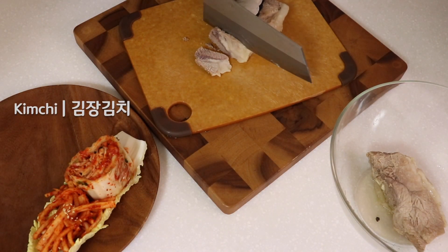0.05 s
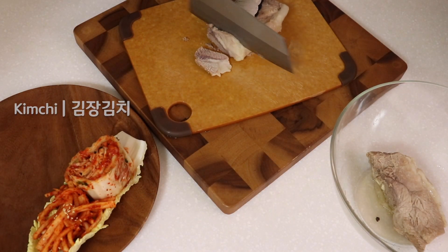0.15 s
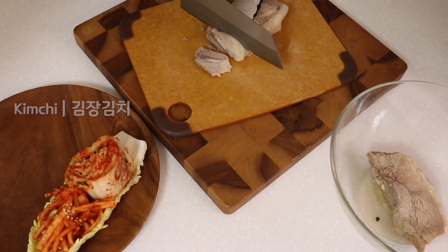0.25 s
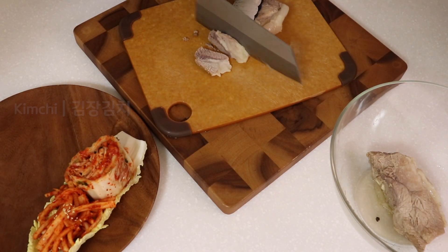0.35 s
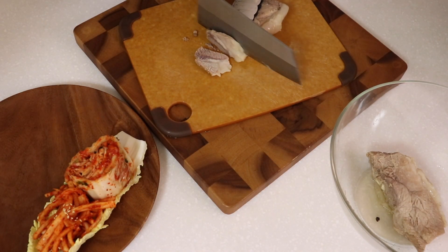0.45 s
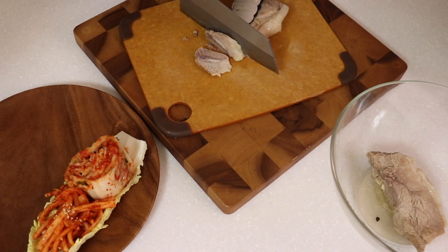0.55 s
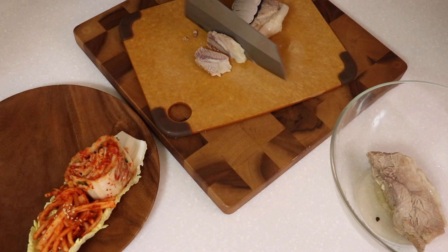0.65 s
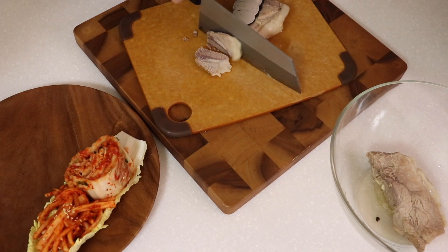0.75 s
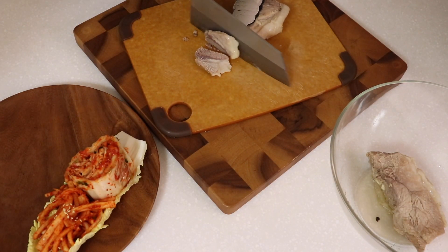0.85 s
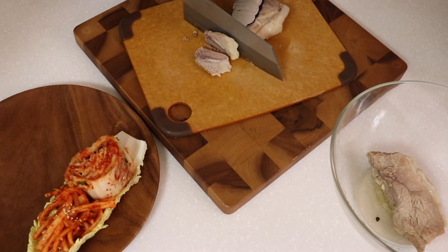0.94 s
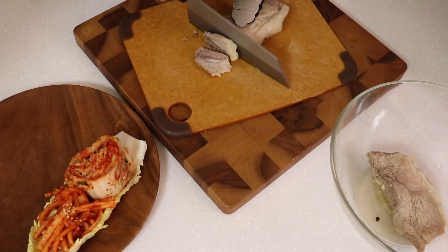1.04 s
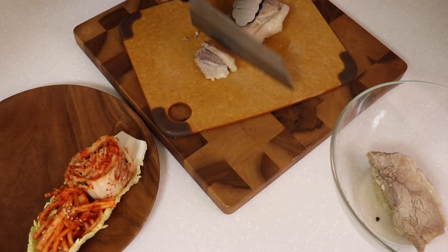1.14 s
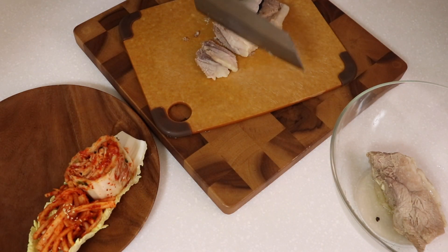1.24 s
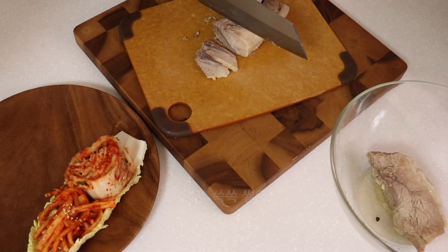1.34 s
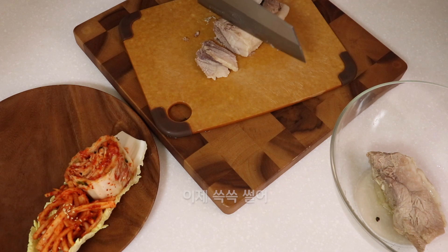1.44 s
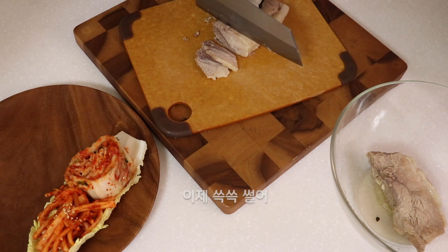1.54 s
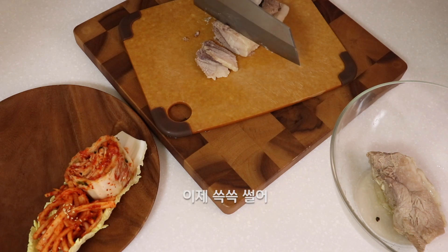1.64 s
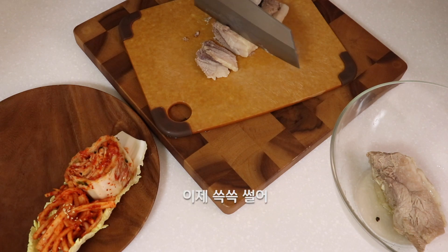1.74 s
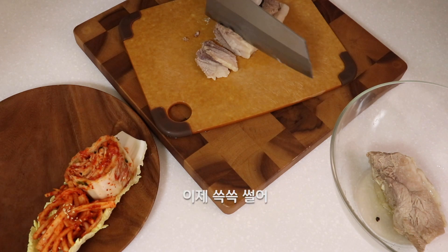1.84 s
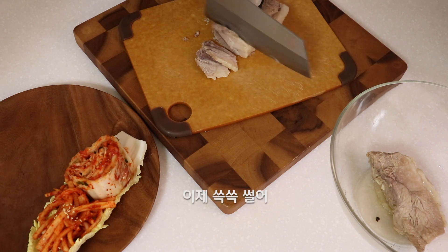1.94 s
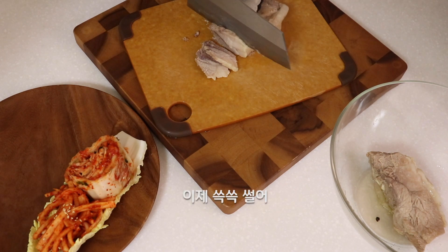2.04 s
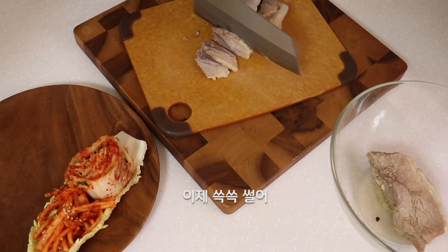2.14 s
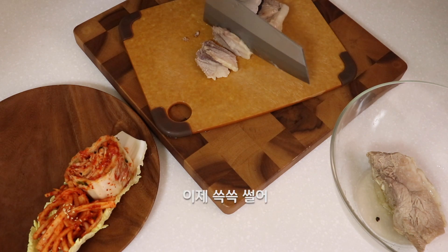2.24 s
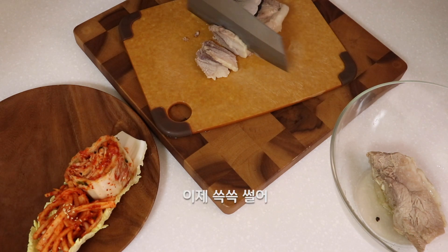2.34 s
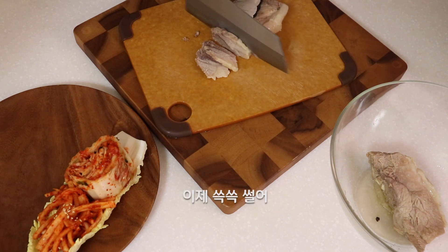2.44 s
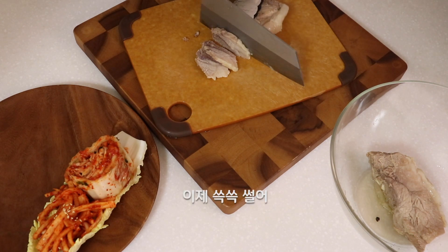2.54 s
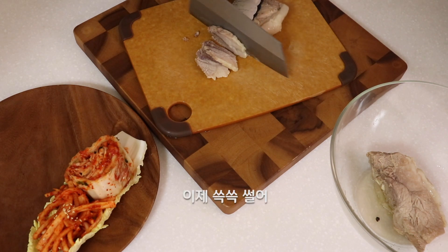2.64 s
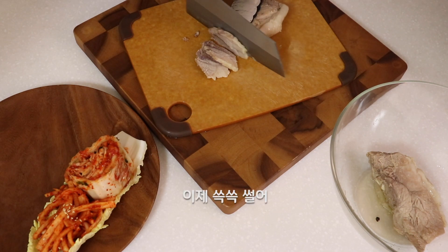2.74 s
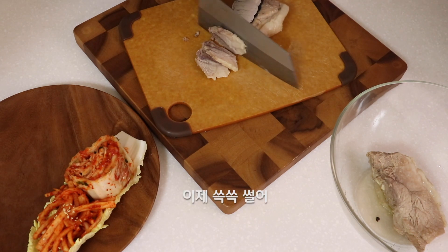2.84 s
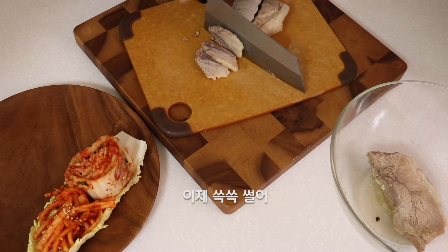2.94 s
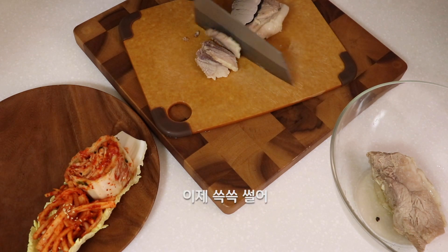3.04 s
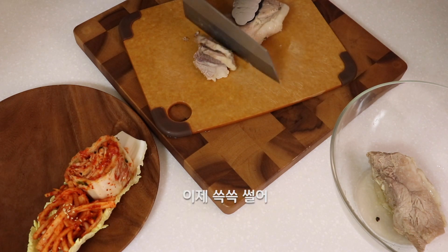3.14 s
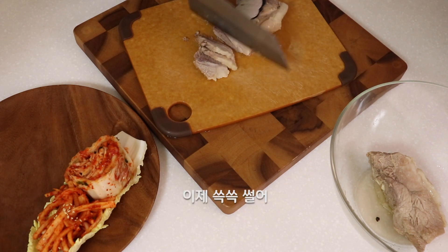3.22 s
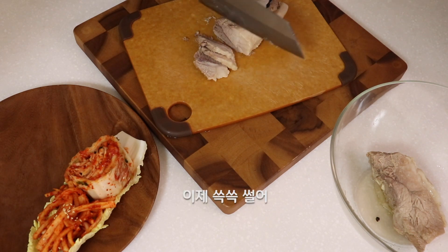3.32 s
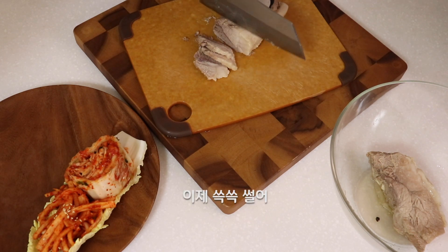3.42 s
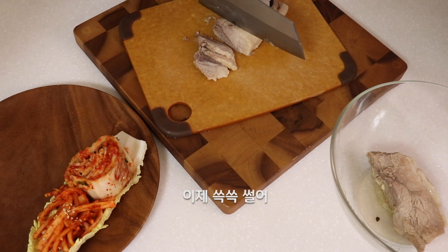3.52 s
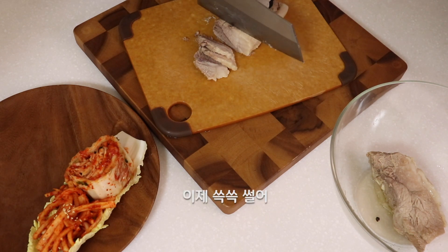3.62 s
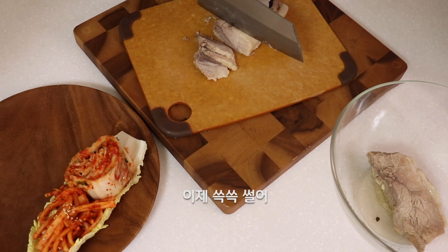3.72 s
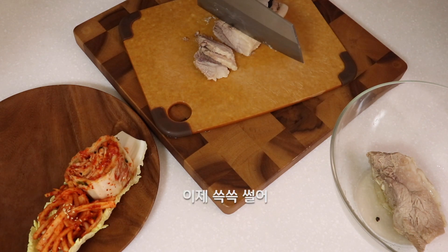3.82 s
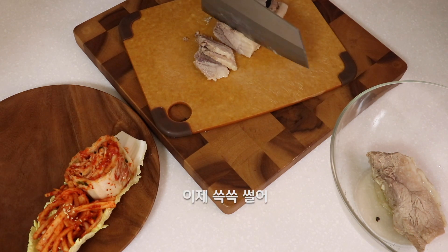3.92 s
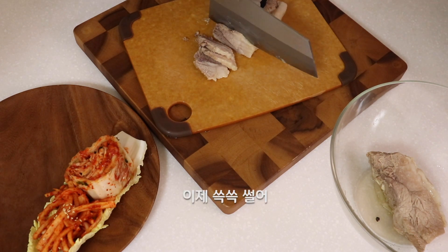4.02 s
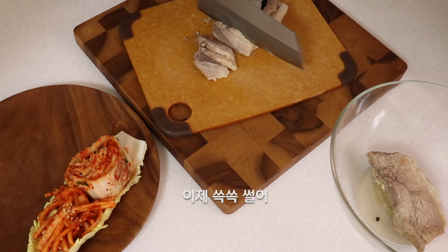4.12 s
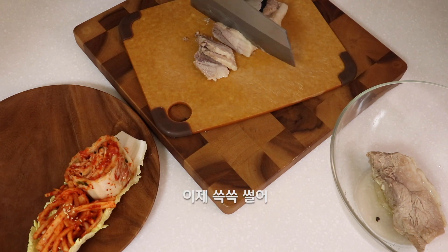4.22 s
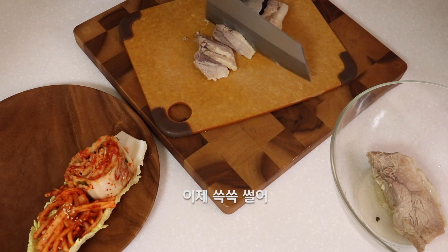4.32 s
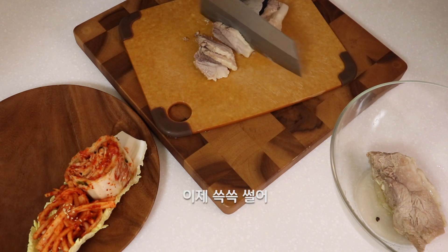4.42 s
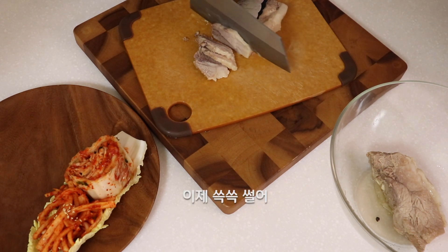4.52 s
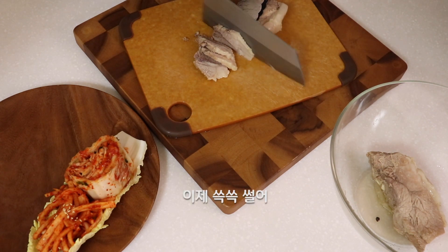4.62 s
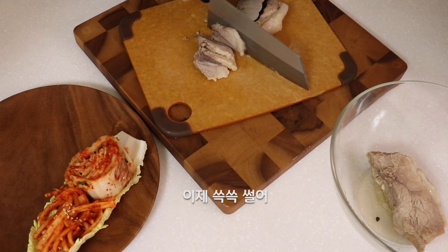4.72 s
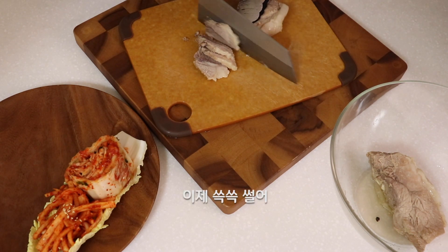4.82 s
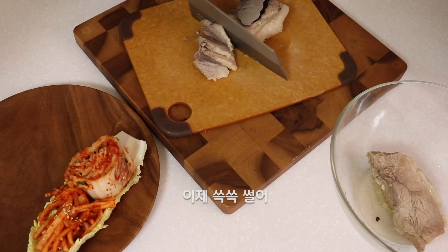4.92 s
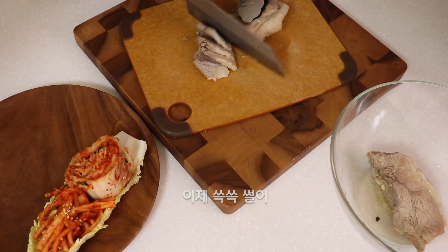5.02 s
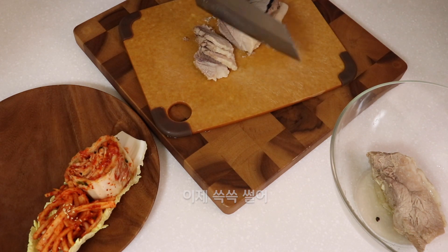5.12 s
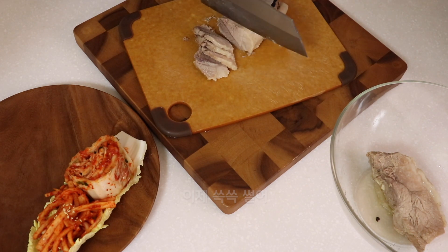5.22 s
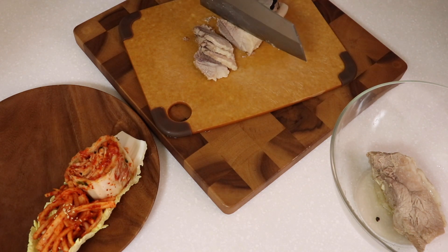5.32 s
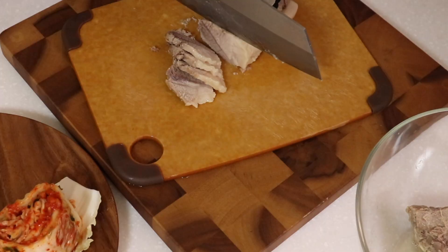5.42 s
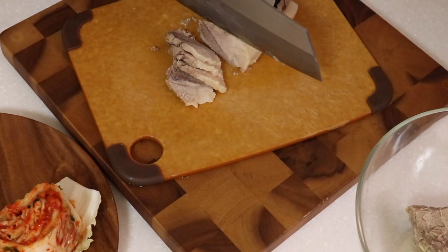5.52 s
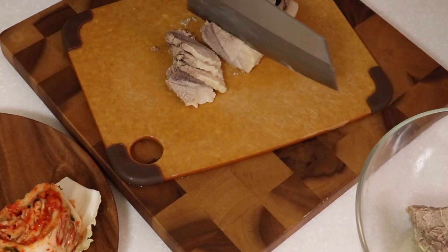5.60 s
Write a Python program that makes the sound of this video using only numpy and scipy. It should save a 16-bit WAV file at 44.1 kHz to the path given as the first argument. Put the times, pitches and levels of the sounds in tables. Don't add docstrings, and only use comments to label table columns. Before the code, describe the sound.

A heavy knife saws through moist cooked meat and knocks three times on a wooden board, scraping slices aside in a quiet humming kitchen.

```python
import sys
import numpy as np
from scipy import signal
from scipy.fft import rfft, irfft, next_fast_len
from scipy.io import wavfile

SR = 44100
rng = np.random.default_rng(int(sys.argv[2]) if len(sys.argv) > 2 else 0)


def to_linear_factor(level_db):
    exponent = np.asarray(level_db, float) / 20
    return 10 ** exponent


def put_to_file(sound):
    columns = np.atleast_2d(sound).T
    safe = np.clip(columns, -1, 1)
    whole_steps = np.round(safe * 32767)
    wavfile.write(sys.argv[1], SR, whole_steps.astype(np.int16))


N = 249606

# (pitch [Hz], level [dB], time to fade by 60 dB [s])
BOARD_MODES = [(83, -38.5, 0.504), (103.2, -27, 0.23), (242.4, -11.5, 0.16), (361.3, -4, 0.058),
               (352.3, -6.5, 0.051), (658, -9, 0.134), (668, -6.5, 0.31), (701, -9, 0.337),
               (752.5, -5.5, 0.26), (1104, -3, 0.089), (1146.7, -5.5, 0.2), (1097, 6.5, 0.0092),
               (1267, 4, 0.033), (1499, -10, 0.27), (1488, -5.5, 0.14), (1730, -6.5, 0.037),
               (1900, -7.5, 0.066), (1575, -11, 0.073), (2150, -0.5, 0.016), (2620, -10, 0.04),
               (2680, 0, 0.07), (3430, -19, 0.09), (3930, -15.5, 0.029), (4340, -27.5, 0.043)]
# (pitch [Hz], level [dB], time to fade by 60 dB [s])
BLADE_MODES = [(1132, 11, .04), (1655, 4, .05), (1717, -6, .25), (2480, 0, .08), (3795, -12, .12),
               (3985, -4, .04), (4560, -6, .04), (5184, -16, .6), (5200, 0, .07), (5232, -18, .3),
               (5943, -13, .35), (5985, -15, .3), (6100, -7, .08), (6550, -4, .1), (7240, -11, .14),
               (7960, -5, .12), (8810, 2, .06), (9200, -9, .1), (9700, -13, .2), (9960, -6, .08),
               (10840, -9, .28), (10890, -8, .2), (12450, -12, .1), (13600, -8, .06)]


def rms_one(x):
    return x / np.sqrt(np.mean(x ** 2) + 1e-20)


def peak_one(x):
    return x / np.abs(x).max()


def panned(x, pan_db):
    return x * to_linear_factor(np.array([[.5], [-.5]]) * pan_db)


def at_hz(points, hz):
    point_hz, level_db = np.array(points)[:, 0], np.array(points)[:, 1]
    return np.interp(np.log(hz), np.log(point_hz), level_db)


def drift(rate):
    r = np.exp(-80 * np.pi * rate / SR)
    noise = rng.standard_normal(N // 40 + 2002)
    slow = signal.lfilter([1], [1, -2 * r, r * r], noise)[2000:]
    return np.interp(np.arange(N) / 40, np.arange(len(slow)), rms_one(slow))


def ring(force, hz, t60):
    r = to_linear_factor(-60 / (t60 * SR))
    w = 2 * np.pi * hz / SR
    return signal.lfilter([0, np.sin(w)], [1, -2 * r * np.cos(w), r * r], force + 1e-18)


def body(force, modes, damping=1):
    out = 0
    for k, (hz, db, t60) in enumerate(modes):
        out = out + (-1) ** k * to_linear_factor(db) * ring(force, hz, t60 * damping)
    return out


def shaken(slips, gain, modes, damping):
    steady = body(slips[:SR], modes, damping)
    return body(slips * gain, modes, damping) / np.sqrt(np.mean(steady ** 2))


def grains(per_s, spread_db):
    sizes = to_linear_factor(spread_db * np.minimum(rng.exponential(1, N), 5)) * rng.choice([-1, 1], N)
    return rms_one(sizes * (rng.random(N) < per_s / SR))


def rough_pair(per_s, spread_db):
    return np.abs(grains(per_s, spread_db)) * rng.standard_normal((2, 2, N))


def banded(sources, spectrum, likeness, patchy_db, rate):
    low, high = max(spectrum[0][0], 20), min(spectrum[-1][0], 17000)
    edges = np.geomspace(low, high, int(2.5 * np.log2(high / low)) + 2)
    out = 0
    for k, band in enumerate(zip(edges, edges[1:])):
        sos = signal.butter(2, band, "band", fs=SR, output="sos")
        mid, side = signal.sosfilt(sos, sources[k % 2])
        hz = np.sqrt(band[0] * band[1])
        alike = np.clip(at_hz(likeness, hz), 0, 1)
        gain = to_linear_factor(at_hz(spectrum, hz) + patchy_db * drift(rate))
        out = out + gain * (np.sqrt(1 + alike) * mid + np.sqrt(1 - alike) * side * [[1], [-1]])
    return rms_one(out)


def swells(rows, db):
    span_db, roundness = 13.5, 1.37
    t, power = np.arange(N) / SR, np.zeros(N)
    for (s, rise, fall, *_), top_db in zip(rows, db):
        part = slice(max(round((s - 4 * rise) * SR), 0), round((s + 4 * fall) * SR))
        away = np.where(t[part] < s, (s - t[part]) / rise, (t[part] - s) / fall)
        power[part] += to_linear_factor(top_db - span_db * away ** roundness) ** 2
    return np.sqrt(power)


def sawing():
    # (peak time [s], rise [s], fall [s], fibre tearing [dB], wet drag [dB])
    strokes = [(.05, 0.24, 0.36, -75.5, -69), (.425, 0.062, 0.054, -64.5, -68),
               (.475, 0.054, 0.037, -63.5, -67.5), (.6, 0.083, 0.079, -69, -80),
               (.73, 0.16, 0.13, -70.5, -72.5), (.8, 0.052, 0.018, -69, -68),
               (1.42, 0.012, 0.024, -82.5, -68), (1.91, 0.042, 0.1, -70, -74),
               (2.06, .06, 0.34, -72.5, -71.5), (2.2, 0.045, 0.048, -70, -68.5),
               (2.285, 0.097, 0.051, -66, -64), (2.36, 0.064, 0.32, -70, -67.5),
               (2.525, .025, 0.15, -66, -66.5), (2.67, 0.022, 0.15, -71, -84),
               (2.757, .02, .02, -89, -67.5), (2.88, 0.061, 0.017, -64, -62), (4.02, 0.037, .11, -67, -72),
               (4.2, 0.096, 0.12, -78, -78), (4.39, 0.093, 0.097, -66.5, -65), (4.51, 0.11, 0.26, -72, -67),
               (4.665, 0.067, 0.08, -65.5, -62), (4.73, 0.061, 0.058, -63, -58.5)]
    # (time [s], level [dB])
    tugs = [
        (.215, -70),
        (.538, -65),
        (1.575, -72),
        (3.508, -82),
        (4.097, -77.5),
        (5.338, -79),
        (5.445, -82),
        (5.66, -69),
    ]
    # (pitch [Hz], level [dB per Hz])
    crackle_colour = [(1760, -26.5), (3000, -12), (4150, -8), (7100, -2.5), (8200, -3.5), (8970, -8),
                      (11100, -4), (15600, -16.5)]
    # (pitch [Hz], level [dB per Hz])
    drag_colour = [(700, -29.5), (1200, -7), (1900, -12), (2800, -10), (4200, -16.5), (6000, -18.5)]
    tug_rise_s, tug_fall_s, tug_wet_db = .015, 0.046, -7.5
    rows = strokes + [(s, tug_rise_s, tug_fall_s, db, db + tug_wet_db) for s, db in tugs]
    *_, tearing_db, wet_db = np.transpose(rows)
    crackle = banded(rough_pair(4997, spread_db=-1.0), crackle_colour,
                     [(4000, 0.7), (14000, 0.22)], patchy_db=1.0, rate=22.0)
    drag = banded(rough_pair(12000, spread_db=1.0), drag_colour,
                  [(1000, 0.78), (4000, 0.34)], patchy_db=4.0, rate=17.0)
    clumps = to_linear_factor(2.2 * drift(49))
    return panned(crackle * swells(rows, tearing_db) * clumps, -0.86) + drag * swells(rows, wet_db)


def snaps():
    # (time [s], peak level [dB], pitch [Hz], pan [dB], width [octaves])
    fibres = [(0.049, -59, 4560, -21, 1), (0.1194, -65, 4830, -1.5, 0.8), (0.2324, -51, 10100, 3, 0.67),
              (0.419, -44.5, 7600, -0.5, 0.59), (0.532, -45, 7500, -3, 0.74), (0.5948, -53, 5130, 0.0, 0.5),
              (0.6659, -68, 7180, -0.5, 0.87), (0.6873, -63, 9400, -2, 0.8), (0.728, -50, 9610, 2, 0.63),
              (1.5697, -56, 6700, -7, 0.41), (2.11, -58, 4590, -1.5, 0.72), (2.202, -54, 5790, -5, 1),
              (2.289, -52, 10600, 1, 0.68), (2.5102, -50, 6440, -4, 0.73), (2.574, -50, 6620, -0.5, 0.23),
              (3.5079, -57, 8670, -3.5, 0.8), (4.097, -49.5, 4980, -3, 0.33), (4.097, -52, 9000, -2, 1),
              (0.277, -61, 1500, -2, 1), (1.571, -56, 1500, 0.0, 0.9), (4.3665, -64, 5640, -1.5, 0.8),
              (4.564, -57, 5050, -6, 0.65), (4.6947, -57, 7040, -1.0, 0.8), (4.7187, -62, 8550, -1.5, 0.8),
              (5.3363, -57, 11380, -4.5, 0.66), (5.441, -58, 5320, -4.5, 0.8)]
    out, t = np.zeros((2, N)), np.arange(400) / SR
    for (s, db, hz, pan_db, width), noise in zip(fibres, rng.standard_normal((len(fibres), len(t)))):
        edges = hz * 2 ** (np.clip(width, .1, 2) * np.array([-.5, .5]))
        band = signal.butter(2, np.minimum(edges, [15000, 17000]), "band", fs=SR, output="sos")
        burst = signal.sosfilt(band, noise * np.exp(-t / .0006))
        at = round(s * SR)
        out[:, at:at + len(t)] += panned(to_linear_factor(db) * peak_one(burst), pan_db)
    return out


def rub():
    # (peak time [s], rise [s], fall [s], level [dB])
    rubs = [(.025, 0.06, 0.061, -71), (.11, 0.09, 0.087, -67.5), (.235, 0.039, 0.026, -63.5),
            (.282, .008, 0.021, -63), (.4, 0.024, 0.027, -66), (.49, 0.044, 0.024, -66),
            (.56, .03, 0.023, -71), (1.43, 0.053, 0.029, -67.5), (1.5, .03, .025, -69),
            (1.577, .008, 0.075, -60.5), (1.73, 0.053, 0.091, -63)]
    # (pitch [Hz], width [Hz], level [dB])
    hollows = [(819, 107, 21.5), (873, 116, 20.5), (1537, 59, 2.5)]
    modes = [(hz, db, 2.2 / width) for hz, width, db in hollows]
    friction = rms_one(body(grains(400, spread_db=-0.5), modes))
    return friction * swells(rubs, [db for *_, db in rubs])


def motor():
    motor_hz = 59.46
    # (multiple of motor rate [1], rms level [dB])
    hum = [(1, -64), (2, -90), (4, -85.5), (5, -85.5), (6, -79.5), (7, -84)]
    # (pitch [Hz], rms level [dB])
    strays = [(47, -81.5), (254, -83), (775, -86.5)]
    t, out = np.arange(N) / SR, 0
    for hz, db in [(k * motor_hz, db) for k, db in hum] + strays:
        level = np.sqrt(2) * to_linear_factor(db + 1.3 * drift(8.7))
        out = out + level * np.sin(2 * np.pi * (hz * t + rng.random()))
    return out


def kitchen_air():
    # (pitch [Hz], level [dB per Hz])
    colour = [(25, -9.5), (45, -4.5), (100, -10), (160, -5.5), (300, -7), (500, -7.5), (1000, -10.5),
              (2000, -13.5), (4000, -18), (8000, -24.5), (13000, -29.5), (16000, -33)]
    # (pitch [Hz], likeness [1])
    alike = [(60, 0.65), (180, 0.55), (550, 0.6), (1650, -0.22), (4970, -1.2), (15000, -0.23)]
    noise = rng.standard_normal((2, 2, N))
    return to_linear_factor(-66.5) * banded(noise, colour, alike, patchy_db=-0.2, rate=7.87)


def sucks():
    # (time [s], length [s], level [dB], pitch [Hz], width [Hz])
    wet_hollows = [
        (0.48, 0.092, -72, 1710, 300),
        (2.285, 0.076, -66.5, 1590, 400),
        (2.863, 0.033, -64, 2680, 300),
        (4.395, 0.082, -64.5, 1830, 300),
        (4.407, 0.025, -69, 1350, 200),
        (4.505, 0.077, -70, 3700, 500),
        (4.491, 0.065, -71, 2900, 250),
        (4.546, 0.063, -68.5, 1970, 300),
        (4.67, 0.11, -59.5, 1930, 353),
        (4.727, 0.072, -66, 2360, 250),
    ]
    out, t = 0, np.arange(N) / SR
    rough = grains(9430, spread_db=1.5)
    for s, length, db, hz, width_hz in wet_hollows:
        swell = np.exp(-.5 * ((t - s) / (0.21 * length)) ** 2)
        out = out + to_linear_factor(db) * swell * rms_one(ring(rough, hz, 3.1 / width_hz))
    return panned(out, -2.1)


def knocks():
    # (time [s], thud peak [dB], ring [dB], hardness as low-pass [Hz], crack [dB],
    # how free the board is as share of ring time [1], tuning of the upper thud [ratio])
    landings = [
        (0.8141, -16, -11, 2400, -29, .55, 1.005),
        (2.8914, -10, -14.5, 3610, -21.5, .76, 1.01),
        (4.7479, -28, -6, 1360, -27.5, 0.28, 1.117),
    ]
    # (pitch [Hz], level [dB], time to fade by 60 dB [s])
    thud_modes = [(276, -20.5, 0.011), (686, -3, 0.016), (1019, 1, 0.008), (1154, 1.5, 0.02),
                  (1586, -6.5, 0.022), (2060, -2, 0.0027), (2627, 0.5, 0.021), (3230, -5.5, 0.008),
                  (3870, -2, 0.0065), (5110, -8, 0.011)]
    rebounds_s = [0.001703, 0.002632, .0052]
    rebound_db = -5.5
    out, t = np.zeros((2, N)), np.arange(SR // 2) / SR
    crack_band = signal.butter(2, [3000, 11000], "band", fs=SR, output="sos")
    chance = rng.standard_normal((len(landings), len(t)))
    for (s, db, ring_db, soft_hz, crack_db, free, tune), noise in zip(landings, chance):
        late = np.maximum(t - np.array([0] + rebounds_s)[:, None], 0)
        pushes = late ** 2 * np.exp(-3 * np.pi * soft_hz * late)
        push = to_linear_factor(rebound_db * np.arange(len(late))) @ pushes
        struck = [(hz, level_db + 0.87 * z, t60) for (hz, level_db, t60), z in zip(BOARD_MODES, noise)]
        crack = signal.sosfilt(crack_band, noise * np.exp(-t / 0.0021))
        dull = thud_modes[:2] + [(hz * tune, level_db, t60) for hz, level_db, t60 in thud_modes[2:]]
        thud = panned(body(push, dull[:5]), -.7) + panned(body(push, dull[5:]), -3.5)
        board_ring = peak_one(body(push, struck, free))
        blow = peak_one(thud) + to_linear_factor(ring_db) * board_ring + to_linear_factor(crack_db) * crack
        at = round(s * SR)
        out[:, at:at + len(t)] += to_linear_factor(db) * blow
    return out


def scraped(pressure_share, offset_db):
    # (peak time [s], rise [s], fall [s], pressure [dB], speed [dB])
    moves = [(.835, 0.015, 0.12, -37, -86), (.925, 0.13, 0.075, -55, -67),
             (.976, 0.025, 0.043, -57.5, -67.5), (1.085, 0.032, 0.051, -58.5, -69.5),
             (1.133, 0.0099, 0.014, -53.5, -52.5), (1.17, .02, 0.11, -72.5, -74),
             (2.915, 0.03, 0.12, -42, -73.5), (2.973, 0.049, 0.076, -39.5, -72.5),
             (3.085, 0.03, 0.048, -57, -65.5), (3.135, 0.07, 0.03, -54.5, -59),
             (3.173, 0.02, 0.013, -45.5, -52.5), (3.21, 0.028, 0.092, -70.5, -71.5),
             (4.772, 0.017, 0.0083, -34.5, -96), (4.858, 0.054, 0.059, -55.5, -64),
             (4.94, 0.1, 0.11, -61, -71), (5.01, 0.006, 0.012, -50, -63.5)]
    levels = [pressure_share * pressure + (1 - pressure_share) * speed + offset_db
              for *_, pressure, speed in moves]
    return swells(moves, levels)


def edge_noise(gain, modes, spectrum, steel_db):
    fine = rng.standard_normal(N)
    right = panned(shaken(fine, gain, modes[::2], damping=0.9), -12.5)
    left = panned(shaken(fine, gain, modes[1::2], damping=0.77), 0.99)
    hiss = banded(rough_pair(9000, spread_db=3.0), spectrum,
                  [(3000, 0.25), (12000, 0.58)], patchy_db=1.5, rate=37.0)
    return to_linear_factor(steel_db) * (right + left) + to_linear_factor(1.0) * hiss * gain


def scrapes():
    # (pitch [Hz], level [dB], time to fade by 60 dB [s])
    pressed = [(2480, 2, .045), (2680, 1, .045), (3300, -3, .025), (3950, -1, .03), (4620, -5, .02),
               (5400, -6, .02), (6100, -7, .015), (7300, -6, .015), (8000, -8, .012), (9000, -8, .012),
               (10100, -8, .012), (11200, -9, .01), (12500, -10, .01)]
    # (pitch [Hz], level [dB per Hz])
    hiss_colour = [(1700, 13), (2500, -2), (4000, 5.5), (5800, -1.5), (7500, -2), (10000, -0.5),
                   (13000, -27), (16000, -19)]
    slips = grains(5000, spread_db=2.5) * to_linear_factor(1.5 * drift(30))
    deep = to_linear_factor(-4) * shaken(slips, scraped(1, 0.11), BOARD_MODES[3:9], damping=.4)
    upper = to_linear_factor(-2.5) * shaken(slips, scraped(0.68, 7.3), BOARD_MODES[9:19], damping=.26)
    grit = edge_noise(scraped(0.27, 1.95), pressed[:6], hiss_colour[:4], steel_db=-3)
    fine_gain = scraped(.01, 0.096)
    fine = edge_noise(fine_gain, pressed[6:], hiss_colour[3:], steel_db=-13)
    # contact caps their ring time [s], and speed drives them steeply
    sung = [(hz, db, min(t60, .07)) for hz, db, t60 in BLADE_MODES[4:]]
    singing = to_linear_factor(27) * shaken(slips, fine_gain ** 1.6, sung, damping=1)
    return panned(deep, 1.5) + panned(upper, -2.5) + grit + fine + panned(singing, -4.0)


def flicks():
    # (time [s], peak level [dB], length [s], brightness as low-pass [Hz], share of free ring time [1])
    lifts = [
        (1.131, -50, 0.003, 13000, 0.59),
        (3.172, -61, 0.0069, 14000, .6),
        (5.011, -69, .0046, 3000, 0.27),
        (3.51, -82, .004, 14000, .37),
    ]
    out, t = np.zeros(N), np.arange(SR // 2) / SR
    lead_s = .06
    chance = rng.standard_normal((len(lifts), len(BLADE_MODES), 2))
    for (s, db, length, bright_hz, free), draws in zip(lifts, chance):
        swell = np.exp(-.5 * ((t - lead_s) / length) ** 2) / (length * SR)
        at = round((s - lead_s) * SR)
        for (hz, level_db, t60), (spot, phase) in zip(BLADE_MODES, draws):
            gain = to_linear_factor(db + level_db + 2.2 * spot) / (1 + (hz / bright_hz) ** 4)
            pump = swell * np.sin(2 * np.pi * (hz * t + phase))
            out[at:at + len(t)] += gain * ring(pump, hz, t60 * free)
    return panned(out, -2.5)


def bumps():
    # (time [s], level [dB], pitch [Hz], time to fade by 60 dB [s])
    pushes = [
        (1.15, -67, 620, .06),
        (2.665, -63.5, 205, .036),
        (2.85, -68, 500, .04),
        (3.172, -58, 620, .05),
        (4.6, -65, 200, .023),
        (5.01, -64, 630, .07),
    ]
    t, out = np.arange(N) / SR, 0
    for s, db, hz, t60 in pushes:
        push = np.exp(-.5 * ((t - s) / 0.0098) ** 2) * np.sin(2 * np.pi * hz * t)
        out = out + to_linear_factor(db - 39) * ring(push, hz, t60)
    return out


def kitchen(x):
    room_t60_s, wall_cut_hz = 0.31, 4900
    dull, size = np.exp(-2 * np.pi * wall_cut_hz / SR), next_fast_len(N + SR // 2)
    w = 2 * np.pi * np.arange(size // 2 + 1) / size
    wall = (1 - dull) / (1 - dull * np.exp(-1j * w))
    echoes = [0, 0]
    for k, lag in enumerate((rng.uniform(.008, .03, 12) * SR).astype(int)):
        loop = to_linear_factor(-60 * lag / SR / room_t60_s) * wall * np.exp(-1j * w * lag)
        echoes[k % 2] = echoes[k % 2] + loop / (1 - loop) * (-1) ** (k // 2)
    return irfft(rfft(x, size) * np.array(echoes), size)[:, :N]


def scene():
    meat = sawing() + snaps() + sucks() + bumps()
    board = knocks() + scrapes() + flicks()
    room = to_linear_factor(-16) * kitchen(board.mean(axis=0))
    return meat + board + room + panned(rub(), 0.37) + motor() + kitchen_air()


def band_limit(x):
    return signal.sosfilt(signal.butter(12, 15720, fs=SR, output="sos"), x)


def record(dry):
    ceiling = .2
    flat = dry / (1 + np.abs(dry / ceiling) ** 4) ** .25
    return band_limit(flat)


dry = scene()
out = record(dry)
put_to_file(out)
```